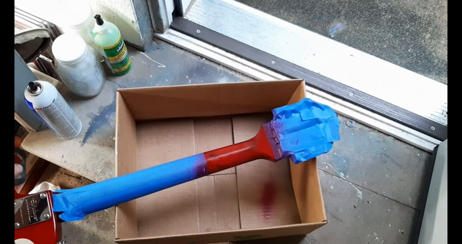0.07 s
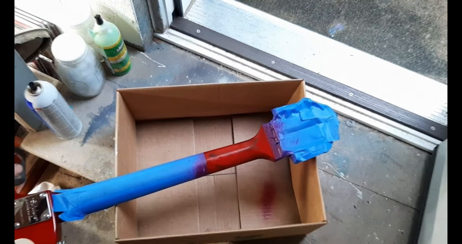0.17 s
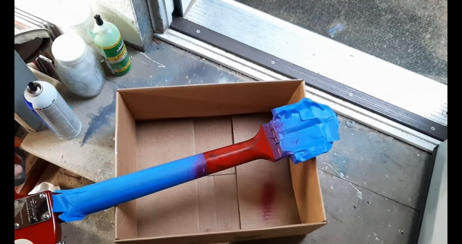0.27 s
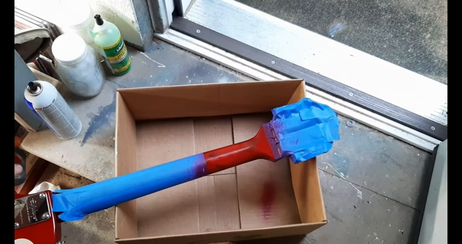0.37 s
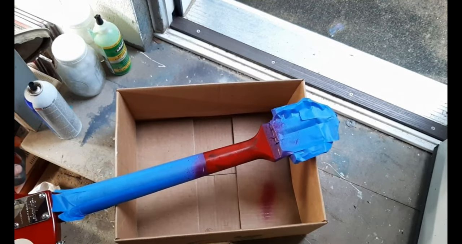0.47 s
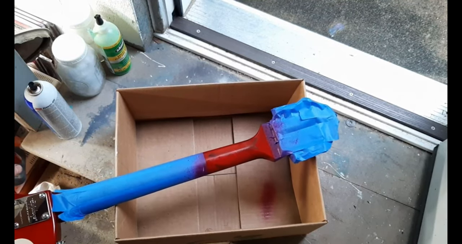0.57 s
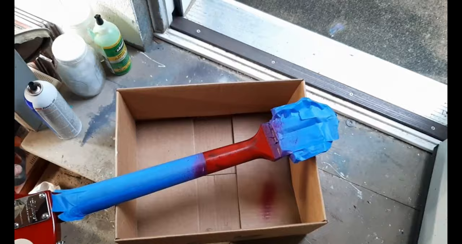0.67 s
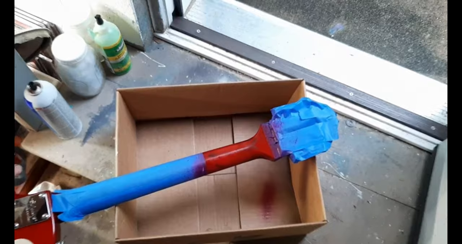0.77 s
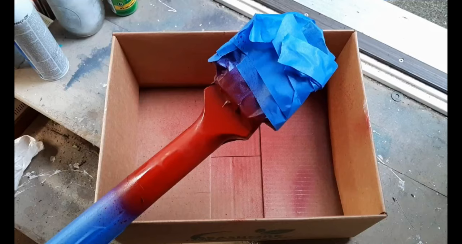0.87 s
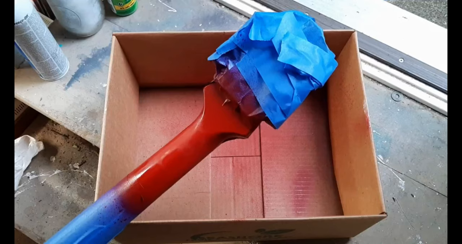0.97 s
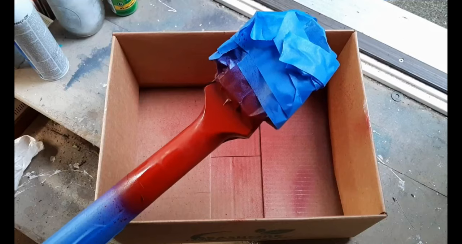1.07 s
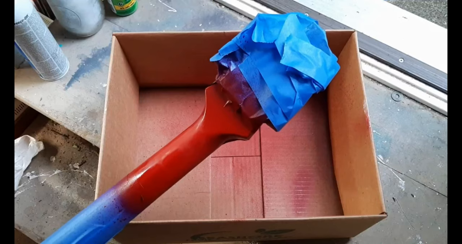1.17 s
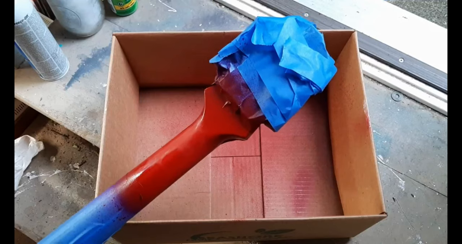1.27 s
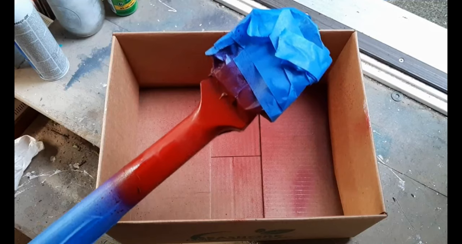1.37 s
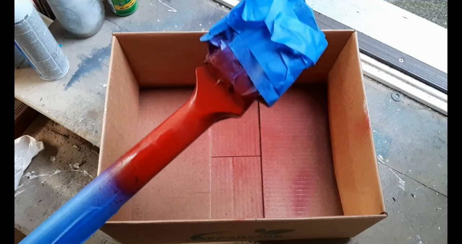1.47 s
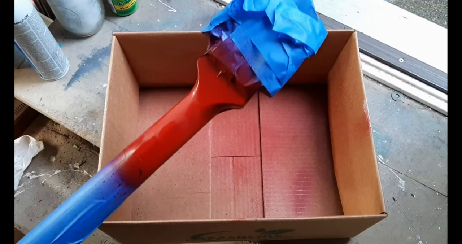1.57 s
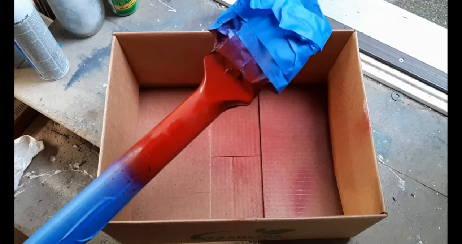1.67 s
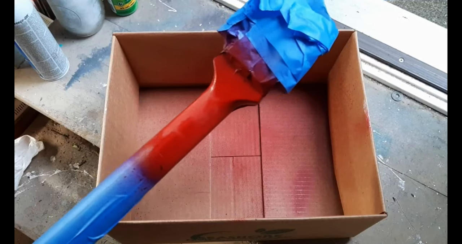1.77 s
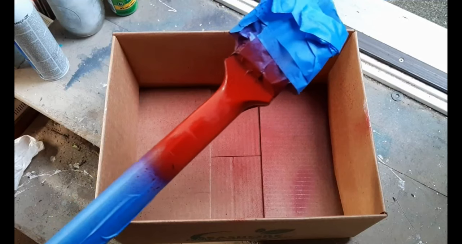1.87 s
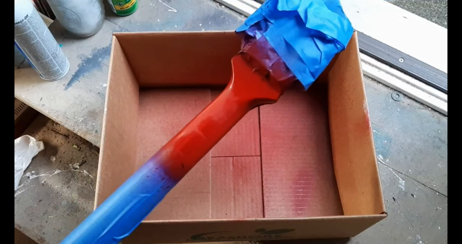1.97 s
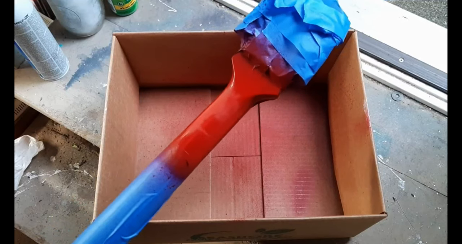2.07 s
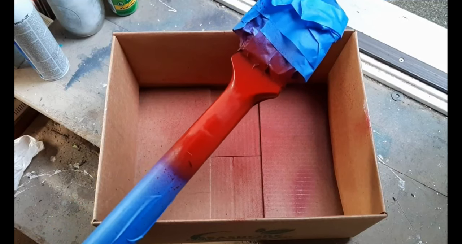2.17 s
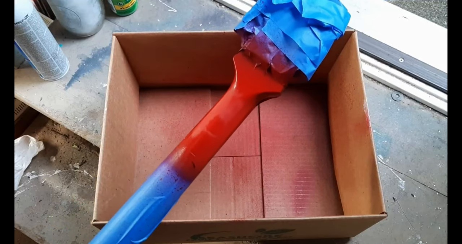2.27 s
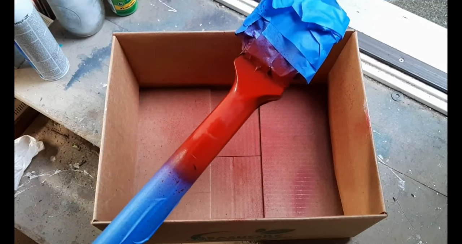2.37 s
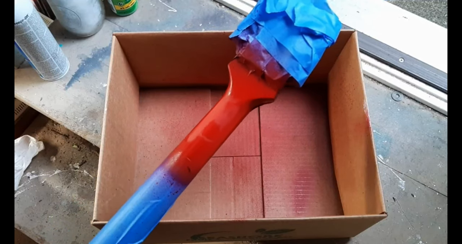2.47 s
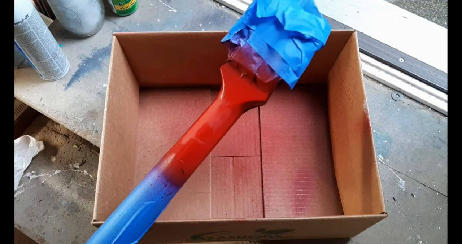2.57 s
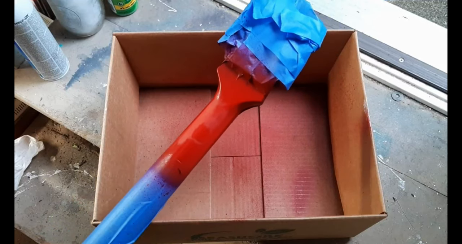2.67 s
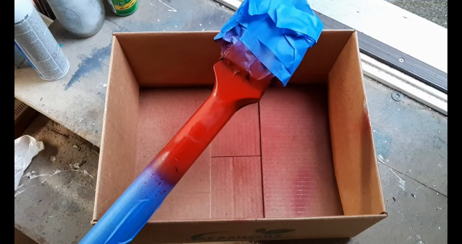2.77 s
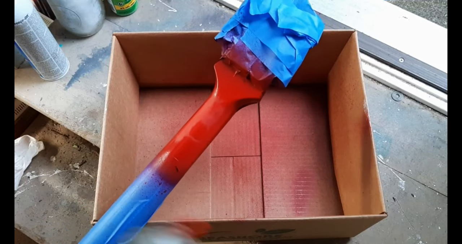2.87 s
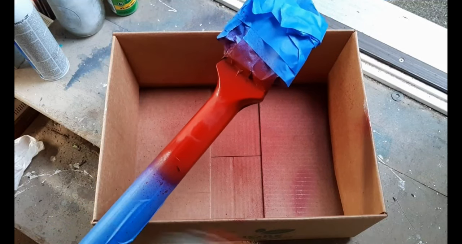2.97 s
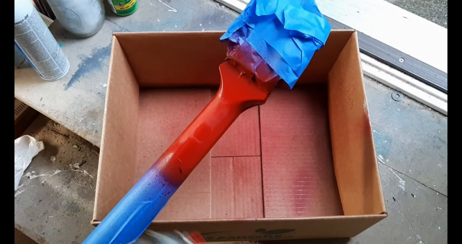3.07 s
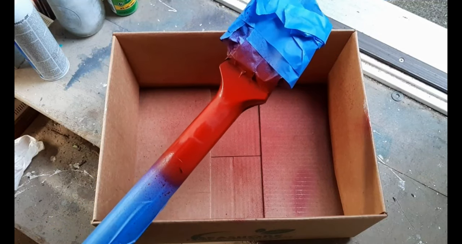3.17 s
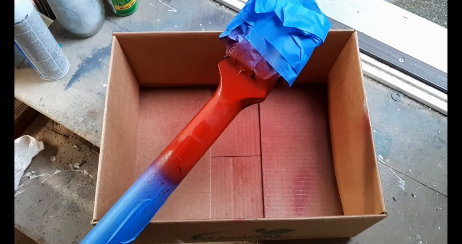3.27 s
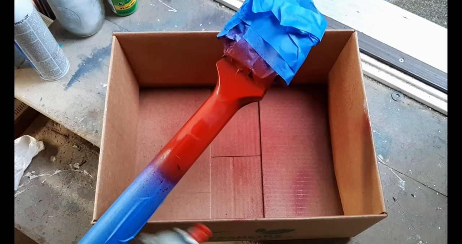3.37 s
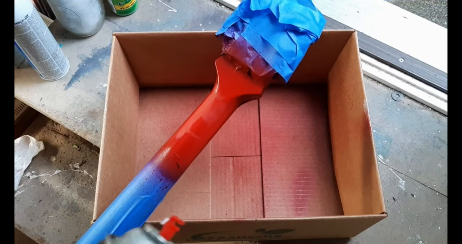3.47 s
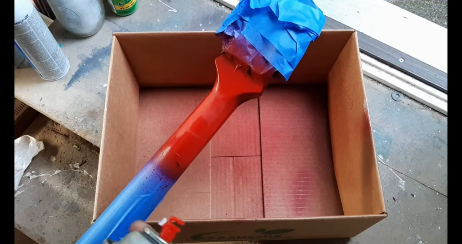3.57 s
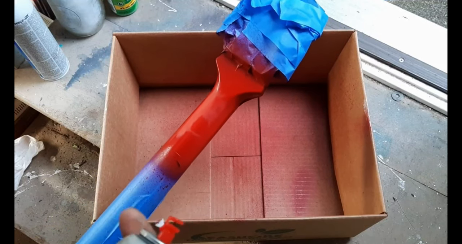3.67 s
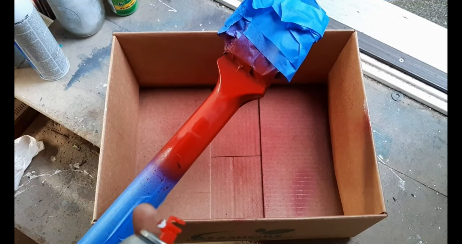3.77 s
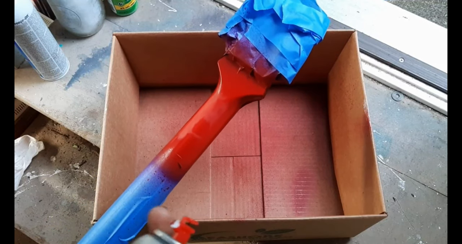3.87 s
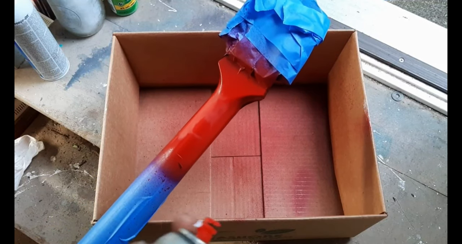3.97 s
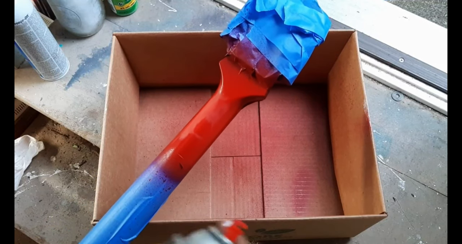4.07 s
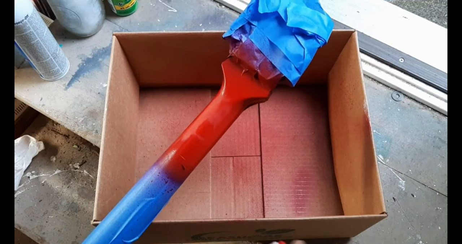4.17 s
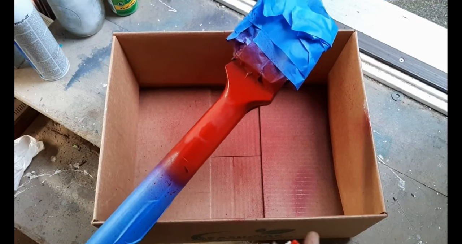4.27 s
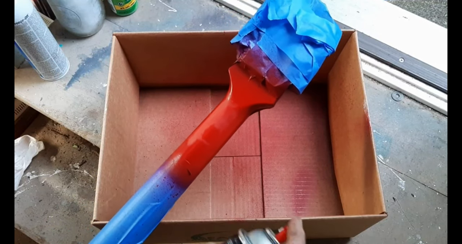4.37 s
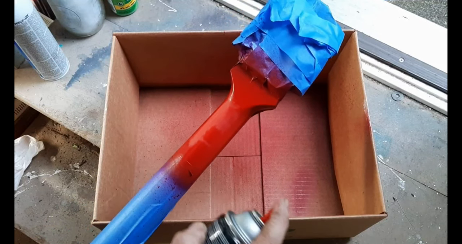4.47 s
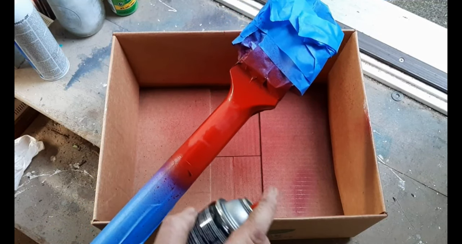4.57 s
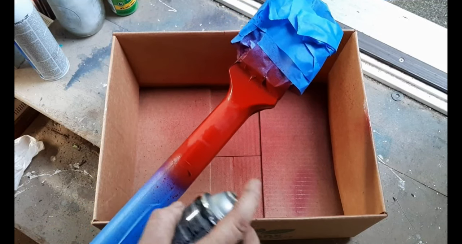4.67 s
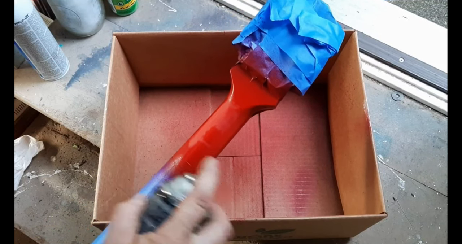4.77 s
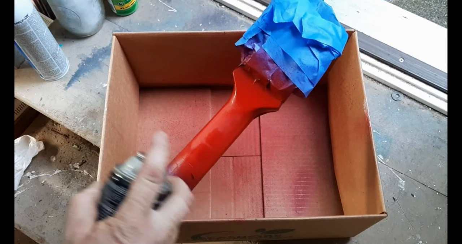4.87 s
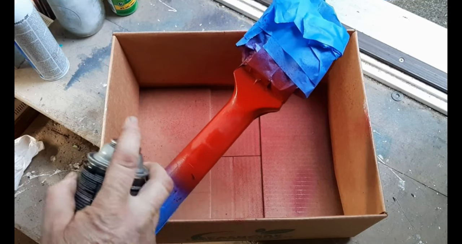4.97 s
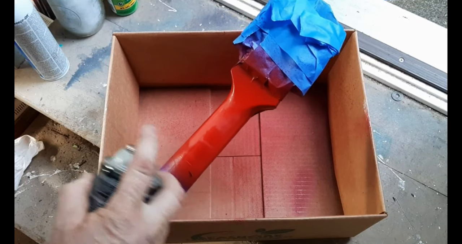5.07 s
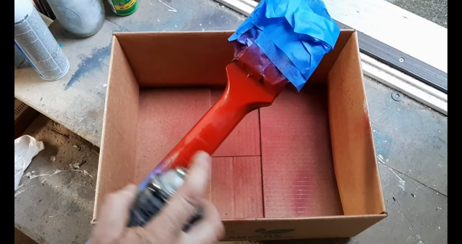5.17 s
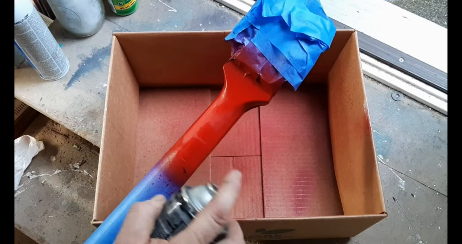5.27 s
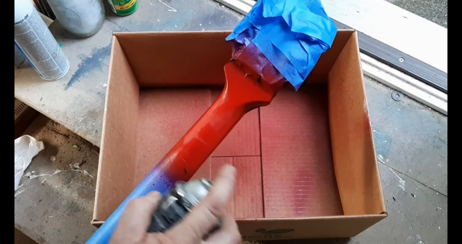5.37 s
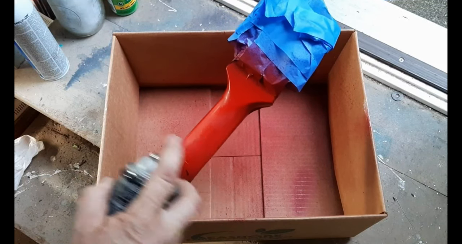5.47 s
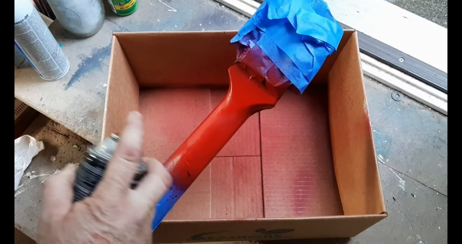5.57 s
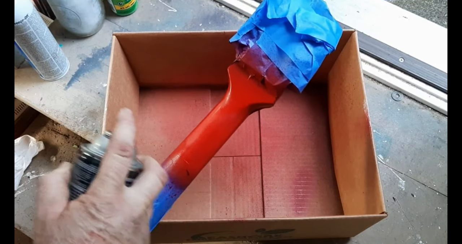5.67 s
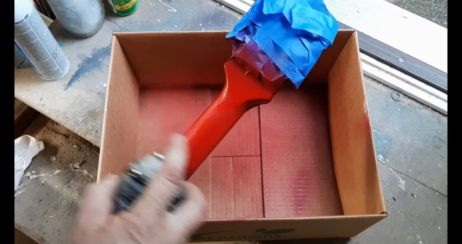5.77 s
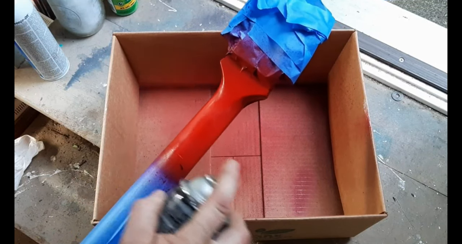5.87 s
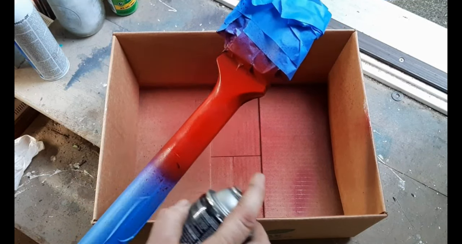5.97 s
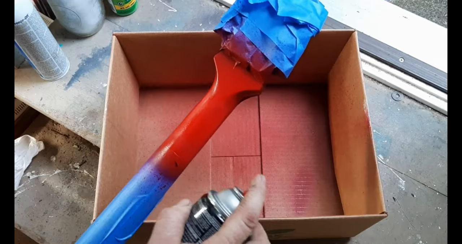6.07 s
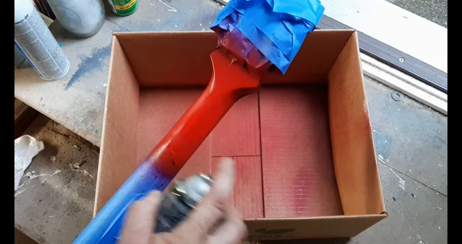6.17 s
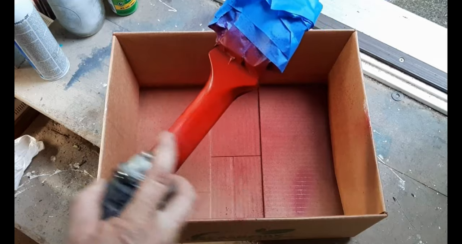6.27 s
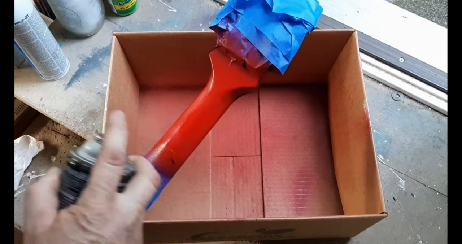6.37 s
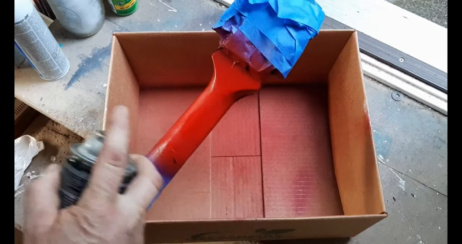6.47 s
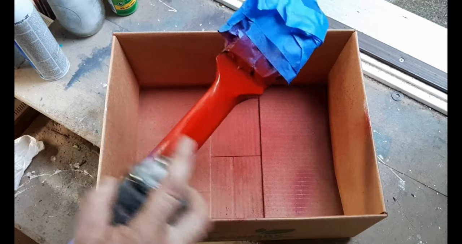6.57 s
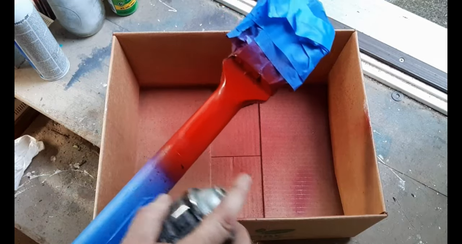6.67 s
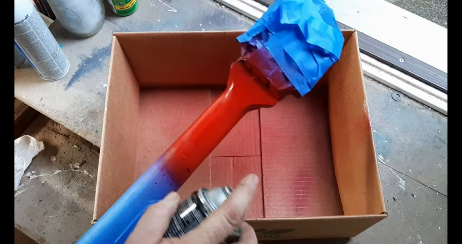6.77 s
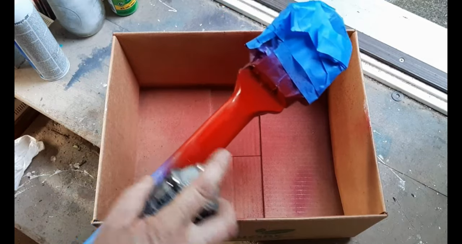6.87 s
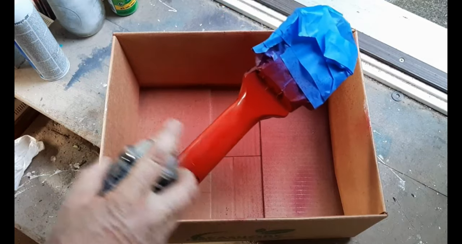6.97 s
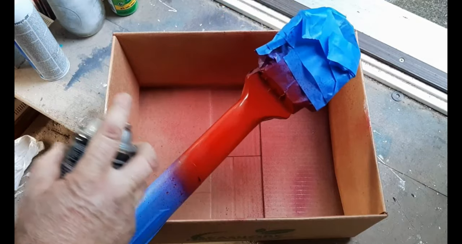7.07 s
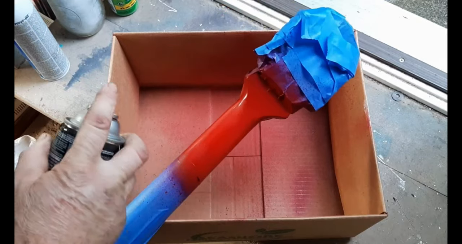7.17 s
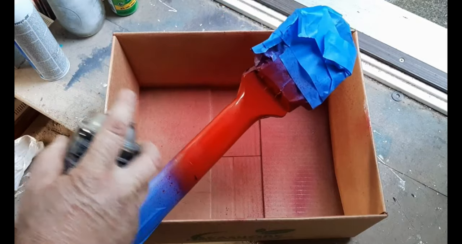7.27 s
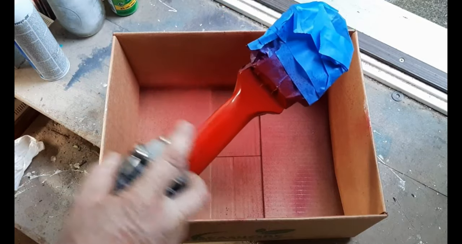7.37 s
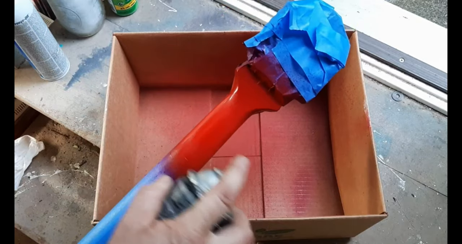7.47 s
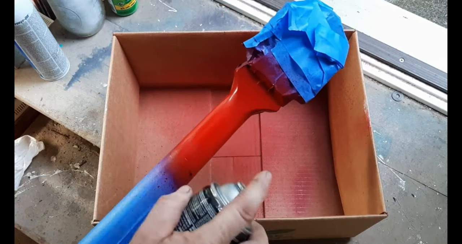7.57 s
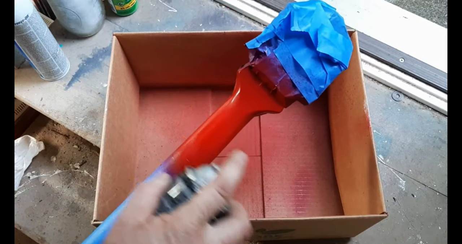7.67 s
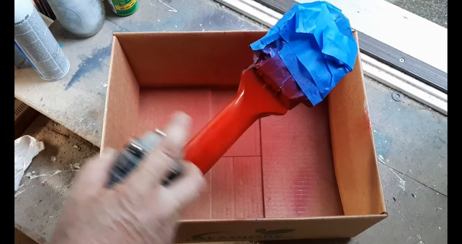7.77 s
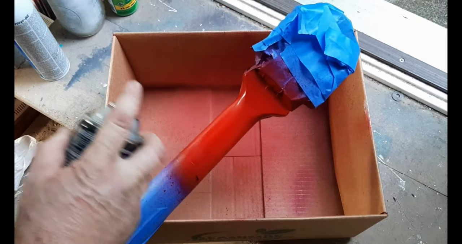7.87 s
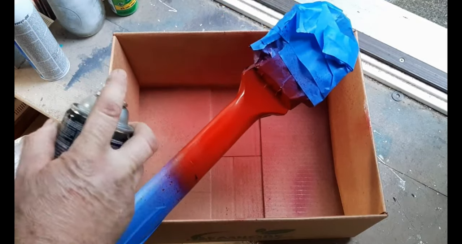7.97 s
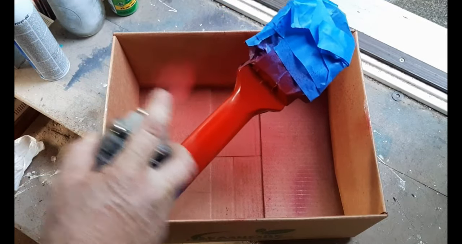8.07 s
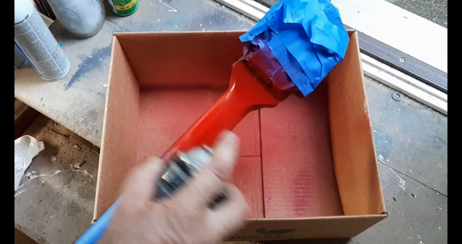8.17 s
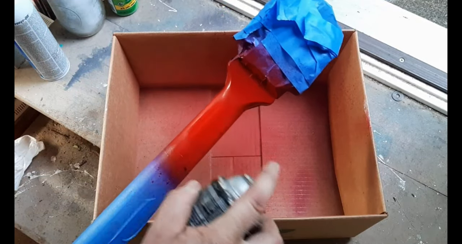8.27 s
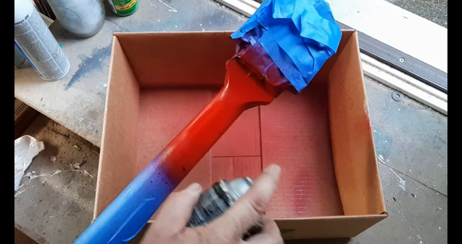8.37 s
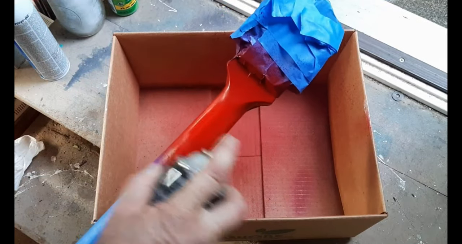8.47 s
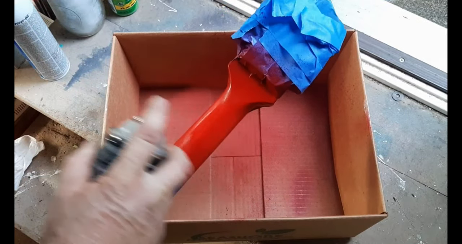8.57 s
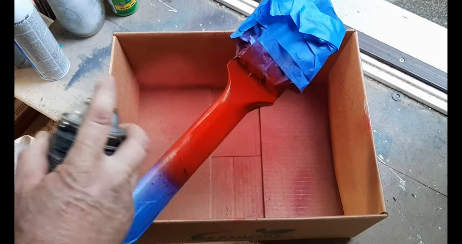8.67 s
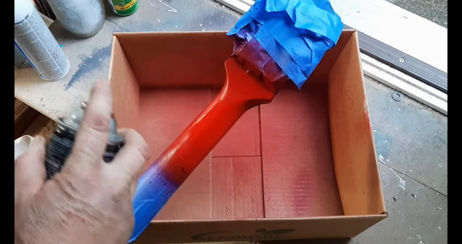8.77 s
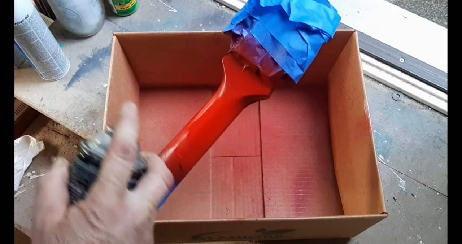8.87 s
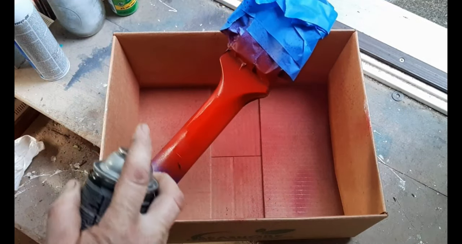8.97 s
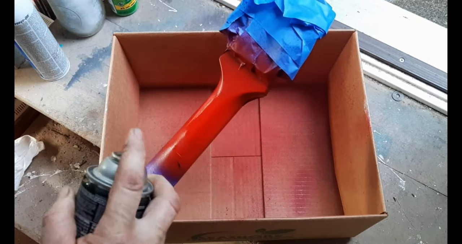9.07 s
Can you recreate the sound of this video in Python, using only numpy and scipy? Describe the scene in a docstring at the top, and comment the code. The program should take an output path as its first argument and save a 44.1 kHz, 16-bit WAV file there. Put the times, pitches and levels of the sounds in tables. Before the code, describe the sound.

For the first 0.86 seconds there is only soft traffic rumble and hiss with a few faint taps, then complete silence until about 0.93. At 1.15 a thud begins vigorous shaking of a steel aerosol can, very close: dense, uneven, bright dry clicks of the mixing ball, with small rebounds and quickly dying clatter, continuing to about 3.6. A few weaker ticks trail off by 4.4. From 4.8 to 8.7 come about ten short puffs of paint, each a soft, breathy, mid-to-high hiss of 0.1 to 0.2 seconds, spaced about 0.3 to 0.7 apart and far quieter than the shaking. Faint hand taps accompany them. Through the open door, low traffic swells, an engine note rises and falls, and a distant bird gives falling whistles between 4.5 and 5.8. After the last puff, street rumble remains until about 9.1. The small workshop adds a short reflection; the stereo phone pickup is wide.

```python
"""Soft traffic rumble and hiss with faint taps come first, then a short silence left by an edit.
A hand then shakes a steel aerosol can: each blow of its mixing ball is a dry click and a dying clatter.
Short puffs of paint follow, each a jet of shaped noise, in a small workshop with its own brief answer.
Through the open door come filtered-noise traffic, an engine note that rises and falls, drones and
a far bird's falling whistles. Two unlike microphone ports of a phone listen."""
import sys
import numpy as np
from scipy import signal
from scipy.fft import rfft, irfft, next_fast_len
from scipy.io import wavfile
from scipy.ndimage import uniform_filter1d, map_coordinates

SR = 44100
rng = np.random.default_rng(int(sys.argv[2]) if len(sys.argv) > 2 else 0)


def magnitude_from_level(level_db):
    """Linear magnitude for a level in decibels (20 dB per decade)."""
    exponent = np.asarray(level_db, float) / 20
    return 10 ** exponent


def inscribe(sig):
    """Save sig as 16-bit PCM at rate SR to the path in sys.argv[1].

    A 1-D sig is mono; a 2-D sig holds one channel per row.
    Samples are clipped to [-1, 1] before scaling.
    """
    pcm = np.round(np.clip(np.atleast_2d(sig).T, -1, 1) * 32767)
    wavfile.write(sys.argv[1], SR, pcm.astype(np.int16))


N = 402633  # samples

# Source levels are those ahead of random wander, the room and the colour of the ports.
# Clearest blows of the ball, ahead of NEAR_DB and CLICK_BRIGHTNESS_DB:
# start_s, click_level_db, treble_db (against the click's body)
BALL_BLOWS = [(1.152, -6.5, -10.5), (1.2072, -7.5, -33), (1.2558, -16, -28), (1.266, -8, -73),
              (1.3483, -20.5, -10.5), (1.3882, -4, -24), (1.4155, -4, -14), (1.4753, -15.5, -16),
              (1.5085, -8, -18), (1.5695, -9.5, -18), (1.63, -9.5, -15), (1.6536, -8.5, -21),
              (1.6714, -3.5, -27), (1.717, -7, -56), (1.789, -19.5, -26), (1.8168, -8.5, -21),
              (1.8994, -6, -7.5), (1.9392, -6, -23), (1.9714, -8, -4.5), (1.9947, -9.5, -21),
              (2.0134, -10, -29), (2.0679, -10, -13.5), (2.1291, -6.5, -33), (2.1724, -20.5, -33),
              (2.2024, -7.5, -33.5), (2.2199, -10, -19), (2.2357, -7.5, -6.5), (2.2844, -8.5, -15.5),
              (2.359, -16.5, -21), (2.4046, -2, -14), (2.5022, -19, -12), (2.5438, -9.5, -42),
              (2.5662, -2, -15.5), (2.597, -4.5, -34), (2.6339, -17, -29.5), (2.6549, -3, -28),
              (2.678, -9.5, -27), (2.7013, -5, -39), (2.7796, -9.5, -10.5), (2.8416, -15.5, -21),
              (2.8511, -3, -22.5), (2.9846, -8, -16.5), (3.0146, -15, -27), (3.055, -17, -13),
              (3.0671, -4, -27), (3.0898, -4.5, -28), (3.1405, -7.5, -8.5), (3.2342, -23.5, -11),
              (3.3515, -7.5, -4), (3.3865, -6.5, -13.5), (3.4004, -11, -11), (3.4565, -16, -27),
              (3.484, -15, -31), (3.5336, -18, -8), (3.5693, -19.5, -35), (3.8283, -22, -23),
              (4.0688, -31, -16), (4.2014, -36.5, -14), (4.337, -36.5, -32), (4.4119, -39, -35)]
# Rebounds after a hard stroke, ahead of NEAR_DB: start_s, length_s, level_db (of the first rebounds)
BALL_RATTLES = [(1.155, .04, -20.5), (1.266, 0.059, -20.5), (1.39, 0.052, -12), (1.477, .015, -14.5),
                (1.509, .055, -15), (1.632, .065, -13), (1.905, 0.15, -20), (2.129, .06, -12),
                (2.211, .04, -15), (2.283, .06, -17.5), (2.356, .04, -9.5), (2.57, .05, -15),
                (2.664, .04, -17), (2.852, .04, -10.5), (2.989, .04, -20.5), (3.07, .07, -11.5),
                (3.243, 0.058, -30.5), (3.388, 0.052, -13), (3.572, 0.021, -27), (3.84, 0.023, -43)]
# Resonances of the paint-damped can, ahead of the colour of each spot: pitch_hz, width_hz, level_db
CAN_RESONANCES = [(415, 1400, -31), (987, 370, -16), (1462, 220, -8), (1910, 940, -5), (2770, 1235, -1.5),
                  (3673, 505, 2), (4700, 1520, -6.5), (5720, 1500, -5), (7040, 3700, -18)]
# Treble of steel on steel: frequency_hz, level_db
STEEL_EDGE = [(6000, -30), (8000, -8), (11000, 0), (16000, 1)]
# How fast the clatter dies: frequency_hz, t60_s
CLATTER_DECAY = [(700, 0.12), (2000, 0.19), (4000, 0.13), (8000, 0.15), (15000, 0.036)]
# Spray puffs: valve_opens_s, valve_shuts_s, level_db (at the start, ahead of the slower onset)
SPRAY_PUFFS = [(4.784, 4.896, -34.5), (5.107, 5.122, -44), (5.152, 5.266, -47), (5.457, 5.596, -34),
               (5.748, 5.905, -33.5), (6.23, 6.389, -34), (6.945, 7.098, -34.5), (7.325, 7.52, -33.5),
               (7.724, 7.891, -34), (8.083, 8.271, -34), (8.523, 8.704, -33.5)]
# Relative spectrum of the spray jet: frequency_hz, level_db
JET_SPECTRUM = [(300, -9), (700, -21), (1200, -9), (1600, -6.5), (2500, -1.5), (4800, 3.5), (7000, -4),
                (12000, -5), (16000, -3)]
# Soft taps and scuffs of hand, can and box: start_s, level_db, pitch_hz, width_hz, t60_s
SOFT_TAPS = [(0.04, -50.5, 1600, 900, 0.066), (.5, -48, 3020, 3050, 0.4), (0.821, -50, 3560, 1500, 0.28),
             (1.041, -53, 1400, 600, 0.17), (1.042, -46, 4200, 1200, 0.31), (1.144, -16, 3570, 3440, 0.02),
             (4.089, -54.5, 1980, 2000, 1), (5.19, -45, 1440, 500, 0.23), (6.694, -48, 1806, 1810, 0.27),
             (8.005, -52.5, 3000, 2500, 0.11), (8.43, -52.5, 1310, 500, 0.12),
             (8.832, -50, 1283, 499, 0.13)]
# Thuds through the bench, ahead of the left-right tilt: start_s, level_db, pitch_hz, t60_s
BENCH_THUDS = [(1.152, -18.5, 69, 0.057), (1.223, -28.5, 239, 0.2), (1.899, -29, 64.7, 0.073),
               (5.218, -50, 76.3, 0.24)]
# Traffic over time: time_s, rumble_level_db, hiss_level_db
STREET_LEVELS = [(0, -60.5, -54), (.86, -59, -56), (.93, -57.5, -64), (1.3, -58, -47.5), (3.6, -49, -58),
                 (4.2, -54.5, -65), (4.6, -60.5, -64.5), (5.3, -51, -56), (6.05, -53.5, -60.5),
                 (8.1, -49.5, -60), (9.13, -53, -57)]
# Relative spectra of the traffic: frequency_hz, level_db
RUMBLE_SPECTRUM = [(15, -53), (25, 7), (59, -0.5), (91, -10.5), (124, -2.5), (284, -9.5), (320, -12.5),
                   (565, -23), (900, -28.5), (1170, -45.5), (1980, -120)]
HISS_SPECTRUM = [(300, -4.5), (700, -1), (1500, 2), (3000, 1.5), (5000, -0.5), (8000, -10), (12000, -12),
                 (16000, -12)]
# Gliding engine note: time_s, pitch_hz, level_db
ENGINE_GLIDE = [(2.1, 105.2, -62), (2.61, 106.9, -64), (3.15, 137.6, -58), (3.48, 145.1, -55.5),
                (4.52, 155.2, -68), (5.28, 162.1, -56), (5.35, 154, -54), (6.48, 124.8, -59),
                (7.69, 129.7, -48.5), (8.18, 129, -54.5), (9.1, 104.6, -49)]
# Street drones: start_s, end_s, pitch_hz, waver_hz (size of the pitch waver), level_db
STREET_DRONES = [(0, 2.5, 52.7, 6.2, -53), (5, 6, 72, 1.63, -47), (5.5, 31, 72, 1.53, -46.5),
                 (0, 5.2, 96, 1.9, -66), (6, 9.14, 246, 1.4, -58), (6.5, 10.05, 319, 1.9, -63.5),
                 (8, 8.45, 413, 1.3, -60), (6.5, 7.6, 180, 3, -57)]
# Falling whistles of the bird: start_s, length_s, first_pitch_hz, level_db
BIRD_CHIRPS = [(4.56, .17, 3040, -66), (4.94, .2, 3000, -61), (5.27, .2, 2980, -60), (5.62, .17, 2990, -61),
               (5.62, .15, 2170, -61)]
# How fast the workshop's answer dies: frequency_hz, t60_s
WORKSHOP_DECAY = [(300, 0.43), (2000, 0.2), (6000, 0.08), (15000, 0.1)]
# Left-right likeness of near sounds and of the street: frequency_hz, likeness (1 = the same)
NEAR_LIKENESS = [(200, .9), (700, .5), (1600, .6), (2600, .25), (4500, .35), (7000, .05)]
STREET_LIKENESS = [(60, .95), (130, .85), (290, .6), (640, .25), (1400, 0)]
# Colour of each microphone port: frequency_hz, level_db
LEFT_PORT = [(100, -5), (1000, 0.5), (3000, 1.5), (5500, -0.5), (7700, 7), (8700, -6.5), (10500, 0),
             (12500, 4.5), (15700, 2.5)]
RIGHT_PORT = [(100, -2.5), (1000, 2.5), (3000, 2), (5000, -1), (7000, -9.5), (8500, -26.5), (10300, -17),
              (11700, 0), (15700, -0.5)]
# Cavity resonances at both ports: pitch_hz, width_hz, level_db
PORT_CAVITIES = [(1545, 70, 6), (2025, 60, 4)]
# Band limits of the whole sound, with a steep cutoff near 16 kHz: frequency_hz, level_db
BAND_LIMITS = [(28, -14), (45, 0), (15750, 0), (16000, -30), (16600, -45), (17000, -80)]
# The edit's silence: start_s, end_s
EDIT_SILENCE = (.862, .925)

PORT_LAG_S = 7 / SR  # can and spray reach the right port later
NEAR_DB = 1.5  # the can is close to the ports
CLICK_BRIGHTNESS_DB = 11.5  # gain of the steel treble over the can's body, on top of each treble_db
CLATTER_DB = -22  # clatter after a clear blow, against its click
REBOUND_GAP_S = 0.013  # mean flight between rebounds
REBOUND_SAG_DB_PER_S, REBOUND_SCATTER_DB = 33.5, 5
REBOUND_TREBLE_DB, REBOUND_CLATTER_DB = -15.5, -17  # glancing: a set treble and more clatter
PRESS_DB_PER_S = 3.5  # the finger presses further down during a puff
CHIRP_SAG_HZ_PER_S = 600


def unit(x):
    """Scales a sound to rms 1."""
    return x / np.sqrt(np.mean(x ** 2) + 1e-20)


def along(points, hz):
    """Reads a curve of (frequency, value) points on a log frequency axis."""
    f, value = np.transpose(points)
    return np.interp(np.log(hz + 1), np.log(f + 1), value)


def curves(rows):
    """Draws one value per sample for each column after the time."""
    s, *columns = np.transpose(rows)
    return [np.interp(np.arange(N) / SR, s, column) for column in columns]


def wobble(rate):
    """Draws a smooth random curve with this many knots a second."""
    knots = rng.standard_normal(int(N * rate / SR) + 4)
    return map_coordinates(knots, [np.arange(N) * rate / SR])


def filtered(x, response):
    """Multiplies the spectrum of x by a complex response of frequency."""
    m = next_fast_len(x.shape[-1] + 8192)
    spectrum = rfft(x, m) * response(np.fft.rfftfreq(m, 1 / SR))
    return irfft(spectrum, m)[..., :x.shape[-1]]


def causal(db):
    """Builds the minimum-phase response with these gains by folding the cepstrum."""
    cepstrum = irfft(np.log(magnitude_from_level(db)))
    half = len(cepstrum) // 2
    cepstrum[1:half] *= 2
    cepstrum[half + 1:] = 0
    return np.exp(rfft(cepstrum))


def band(f, hz, width):
    """Gives the complex response of one damped resonance."""
    return 1j * f * width / (hz * hz - f * f + 1j * f * width)


def late(x):
    """Delays the right channel by the lag between the ports."""
    return filtered(x, lambda f: np.exp(-2j * np.pi * f * np.array([[0], [PORT_LAG_S]])))


def spread(pair, likeness, gain=lambda f: 1):
    """Turns two unrelated signals into mid and side so that left and right are as alike as asked."""
    def mid_side_gains(f):
        turn = np.arccos(np.clip(along(likeness, f), -1, 1)) / 2
        return gain(f) * np.array([np.cos(turn), np.sin(turn)])
    mid, side = filtered(pair, mid_side_gains)
    return np.array([mid + side, mid - side])


def rush(spectrum, likeness, patchy_db):
    """Makes shaped stereo noise of rms 1 with patches of random gain in time and frequency."""
    z = signal.stft(rng.standard_normal((2, N + 512)), nperseg=256)[2]
    patches = uniform_filter1d(rng.standard_normal(z.shape[1:]), size=4, axis=0)
    patches = uniform_filter1d(patches, size=12, axis=1)
    pair = signal.istft(z * magnitude_from_level(patchy_db * unit(patches)), nperseg=256)[1][:, :N]
    return unit(spread(pair, likeness, lambda f: magnitude_from_level(along(spectrum, f))))


def fading(decay):
    """Makes a quarter second of stereo noise, each frequency dying at its own speed."""
    f, t, z = signal.stft(rng.standard_normal((2, SR // 4)), SR, nperseg=128)
    fade = magnitude_from_level(-60 * t / along(decay, f)[:, None])
    return signal.istft(z * fade, SR, nperseg=128)[1][:, :SR // 4]


def add(track, s, piece):
    """Mixes a piece into the track at time s."""
    i = round(s * SR)
    track[:, i:i + piece.shape[1]] += piece[:, :N - i]


def room(x, wet_db):
    """Adds the workshop's answer, the sound convolved with fading noise."""
    tail = fading(WORKSHOP_DECAY)
    answer = signal.fftconvolve(x, tail / np.linalg.norm(tail[0]), axes=1)[:, :N]
    return x + magnitude_from_level(wet_db) * answer


def contacts():
    """Lists (start_s, click_db, treble_db, clatter_db): clear blows, then each rattle's uneven rebounds."""
    rows = [(s, db, treble_db, CLATTER_DB) for s, db, treble_db in BALL_BLOWS]
    for start, length, db in BALL_RATTLES:
        flight, size = rng.random((2, 12))
        times = np.cumsum(REBOUND_GAP_S * (0.5 + flight)) - REBOUND_GAP_S / 2
        for after, u in zip(times, size):
            if after < length:
                level_db = db - REBOUND_SAG_DB_PER_S * after + REBOUND_SCATTER_DB * (2 * u - 1)
                rows.append((start + after, level_db, REBOUND_TREBLE_DB, REBOUND_CLATTER_DB))
    return rows


def can_body(f, spot_db):
    """Sums the can's resonances with alternating sign, each tilted by where the ball lands."""
    total = 0
    for k, (hz, width, level_db) in enumerate(CAN_RESONANCES):
        total = total + (-1) ** k * magnitude_from_level(level_db + spot_db[k]) * band(f, hz, width)
    return total


def steel_edge(f):
    """Gives the treble gain of steel on steel."""
    return magnitude_from_level(along(STEEL_EDGE, f))


def ball_click(t, spot_db, treble_db):
    """Rings the can body and steel edge with a noise knock that dies 60 dB in 3 ms."""
    knock = magnitude_from_level(-60 * t / 0.003) * rng.standard_normal((2, len(t)))
    knock[0, 0] = 5  # the first contact is the hardest
    low = filtered(spread(knock, NEAR_LIKENESS), lambda f: can_body(f, 0.86 * spot_db))
    high = filtered(knock, steel_edge)
    return low / abs(low).max() + magnitude_from_level(treble_db + CLICK_BRIGHTNESS_DB) * high / abs(high).max()


def ball_clatter(t, spot_db, treble_db):
    """Roughens fading noise with tiny bounces to give the clatter of ball, paint and room."""
    ticks = (rng.random(len(t)) < 400 / SR) * rng.exponential(size=len(t))
    uneven = 1 + 11 * uniform_filter1d(ticks, size=30)  # bounces under a millisecond long
    wash = fading(CLATTER_DECAY) * uneven * (1 - np.exp(-t / 0.00073))
    edge_gain = magnitude_from_level(0.52 * treble_db - 12.5)
    clatter = filtered(spread(wash, NEAR_LIKENESS),
                       lambda f: can_body(f, 0.42 * spot_db) + edge_gain * steel_edge(f))
    return clatter / np.sqrt(np.mean(clatter[:, :SR // 40] ** 2))  # rms 1 over the first 25 ms


def blows():
    """Strikes the can at every contact: a dry click, then a clatter, coloured anew by each spot."""
    out, t = np.zeros((2, N)), np.arange(SR // 4) / SR
    for s, db, treble_db, clatter_db in contacts():
        spot_db = 4 * rng.standard_normal(len(CAN_RESONANCES))
        click = magnitude_from_level(db) * ball_click(t, spot_db, treble_db)
        clatter = magnitude_from_level(db + clatter_db) * ball_clatter(t, spot_db, treble_db)
        add(out, s - 0.0004, click + clatter)
    return room(magnitude_from_level(NEAR_DB) * late(out), wet_db=-11.0)


def spray():
    """Opens the valve fast and lets pressure run down after it shuts; droplets roughen the noise jet."""
    t, flow = np.arange(N) / SR, np.zeros(N)
    for opens, shuts, db in SPRAY_PUFFS:
        rise = 1 - np.exp(-np.clip(t - opens, 0, None) / 0.019)
        press_db = PRESS_DB_PER_S * np.clip(t - opens, 0, shuts - opens)
        fall_db = -60 * np.clip(t - shuts, 0, None) / 0.12
        flow += rise ** 1.11 * magnitude_from_level(db + press_db + fall_db)
    roughness = magnitude_from_level(1 + 0.8 * wobble(25) + 1.2 * wobble(400))
    jet = flow * roughness * late(rush(JET_SPECTRUM, NEAR_LIKENESS, patchy_db=1.1))
    return room(jet, wet_db=-5)


def handling():
    """Makes taps from broad puffs of noise, and thuds from low pushes stronger at the left port."""
    out, t = np.zeros((2, N)), np.arange(SR // 3) / SR

    def band_noise(hz, width):
        return unit(filtered(rng.standard_normal((2, len(t))), lambda f: band(f, hz, width)))

    for s, db, hz, width, t60 in SOFT_TAPS:
        onset = 1 - np.exp(-t / (0.0044 * t60))
        add(out, s, magnitude_from_level(db - 60 * t / t60) * onset * band_noise(hz, width))
    for s, db, hz, t60 in BENCH_THUDS:
        push = 0.7 * np.sin(2 * np.pi * hz * t) + 0.8 * band_noise(hz, 1.4 * hz)
        add(out, s, magnitude_from_level(db - 60 * t / t60) * push * magnitude_from_level([[3.0], [-3.0]]))
    return out


def tone(hz):
    """Sums a moving pitch into the phase of a sine of rms 1."""
    return np.sqrt(2) * np.sin(2 * np.pi * np.cumsum(hz) / SR)


def traffic():
    """Makes rumble and hiss from shaped noise whose levels drift."""
    rumble_db, hiss_db = curves(STREET_LEVELS)
    rumble = magnitude_from_level(rumble_db + 1.6 * wobble(4.6)) * rush(RUMBLE_SPECTRUM, STREET_LIKENESS, patchy_db=1.36)
    hiss = magnitude_from_level(hiss_db + 0.6 * wobble(5)) * rush(HISS_SPECTRUM, STREET_LIKENESS, patchy_db=0.7)
    return rumble + hiss


def engine():
    """Glides one engine order as a sine with an unsteady pitch and level."""
    hz, level_db = curves(ENGINE_GLIDE)
    started = np.arange(N) / SR > ENGINE_GLIDE[0][0]
    return started * magnitude_from_level(level_db + 3.5 * wobble(10)) * tone(hz + 1.1 * wobble(9))


def drones():
    """Swells wavering sines along half-sine arches; one is still rising at the end."""
    out, t = np.zeros(N), np.arange(N) / SR
    for start, end, hz, waver, db in STREET_DRONES:
        swell = np.sin(np.pi * np.clip((t - start) / (end - start), 0, 1)) ** 0.6
        out += magnitude_from_level(db + 3.9 * wobble(13)) * swell * tone(hz + waver * wobble(2.5 * waver + 4))
    return out


def street():
    """Sums wide traffic noise with the engine and drones, which are equal in both channels."""
    return traffic() + engine() + drones()


def bird():
    """Blurs falling whistles with slow random gains, as by distance, unlike at the two ports."""
    out = np.zeros((2, N))
    for start, length, first_hz, db in BIRD_CHIRPS:
        u = np.linspace(0, 1, round(length * SR))
        blur = filtered(rng.standard_normal((2, 2, len(u))), lambda f: f < 80)
        hz = first_hz - CHIRP_SAG_HZ_PER_S * length * u
        whistle = np.exp(2j * np.pi * np.cumsum(hz) / SR)
        blurred = unit(np.real(whistle * (blur[0] + 1j * blur[1])))
        add(out, start, magnitude_from_level(db) * np.sin(np.pi * np.sqrt(u)) * blurred)
    return out


def scene():
    """Sums can, spray, hand, street and bird."""
    return blows() + spray() + handling() + street() + bird()


def low_pass(x):
    """Removes everything above the highest recorded frequency."""
    return signal.sosfilt(signal.butter(12, 16990, fs=SR, output="sos"), x)


def record(dry):
    """Colours each port, limits the band, adds capsule hiss, mutes the edit and softly overloads the input."""
    def responses(f):
        cavity_db = sum(db * abs(band(f, hz, width)) ** 2 for hz, width, db in PORT_CAVITIES)
        shared_db = along(BAND_LIMITS, f) + cavity_db
        return [causal(along(port, f) + shared_db) for port in (LEFT_PORT, RIGHT_PORT)]

    x = filtered(dry, responses)
    capsule_hiss = filtered(rng.standard_normal((2, N)), lambda f: (f > 9500) * magnitude_from_level(along(BAND_LIMITS, f)))
    x += magnitude_from_level(-80) * capsule_hiss
    t = np.arange(N) / SR
    mute_start, mute_end = EDIT_SILENCE
    x *= np.clip(np.maximum(mute_start - t, t - mute_end) / 0.0013, 0, 1)  # fades of 1.3 ms
    x /= (1 + abs(x / 0.97) ** 6) ** (1 / 6)  # soft overload of the input stage
    return low_pass(x)


dry = scene()
out = record(dry)
inscribe(out)
```